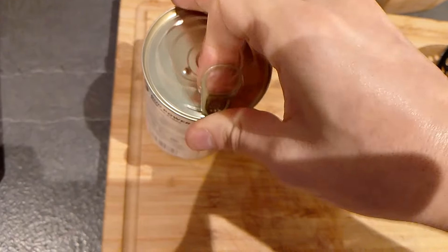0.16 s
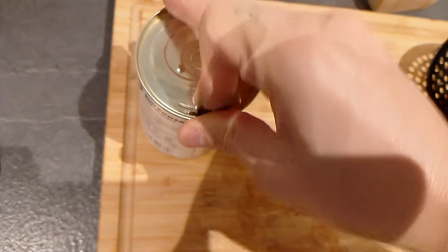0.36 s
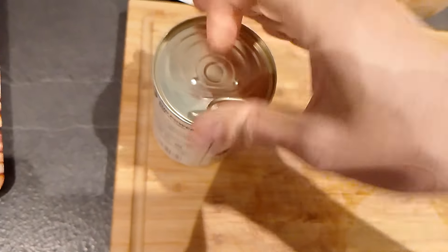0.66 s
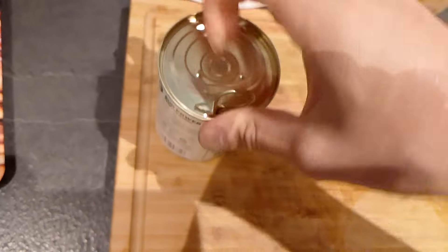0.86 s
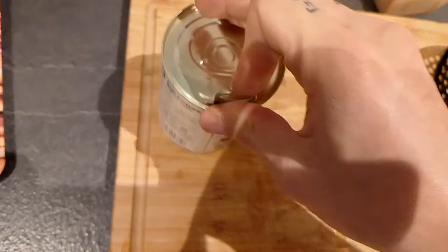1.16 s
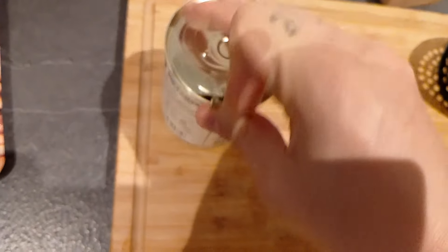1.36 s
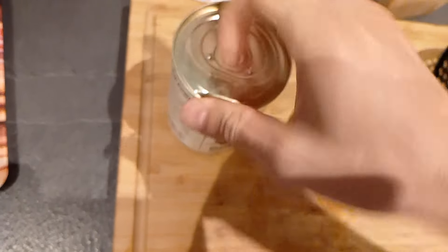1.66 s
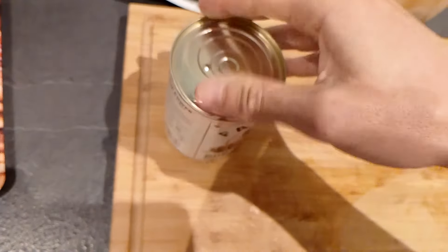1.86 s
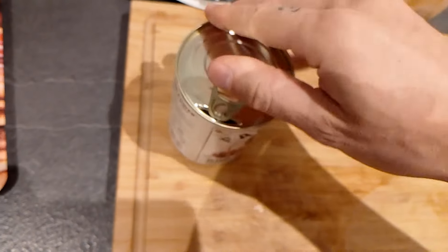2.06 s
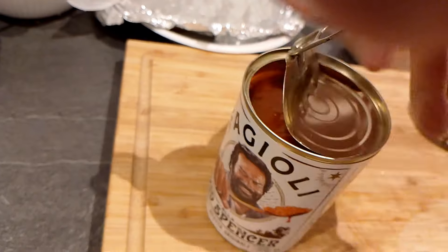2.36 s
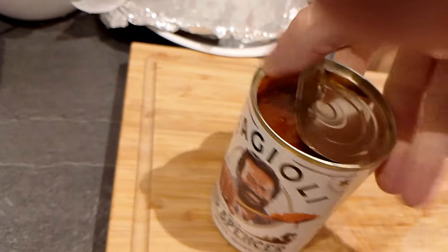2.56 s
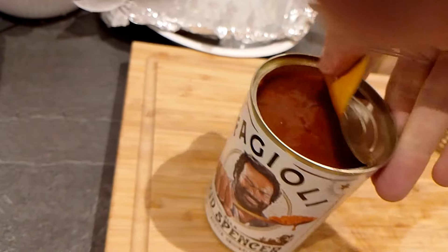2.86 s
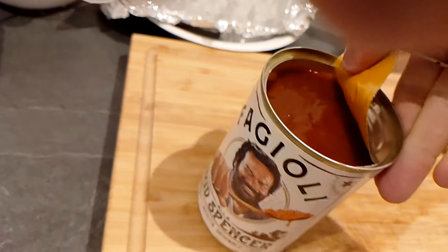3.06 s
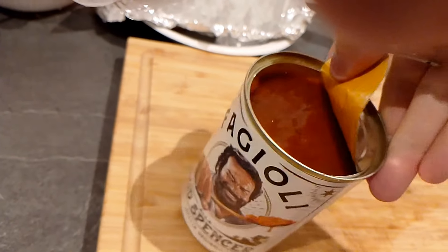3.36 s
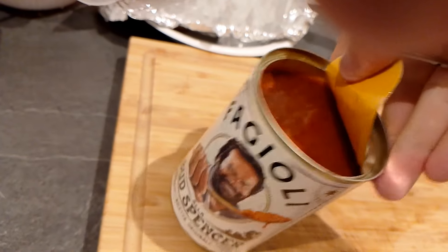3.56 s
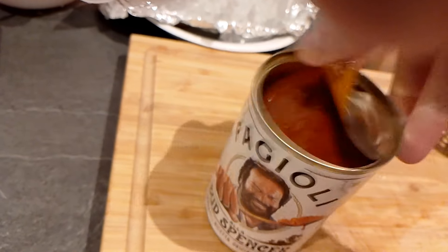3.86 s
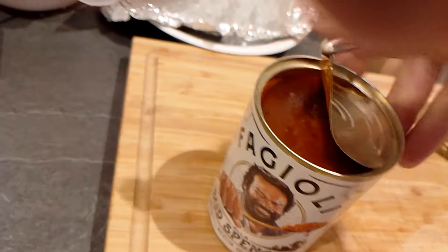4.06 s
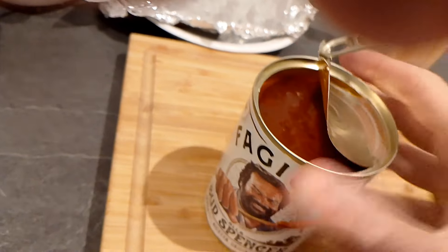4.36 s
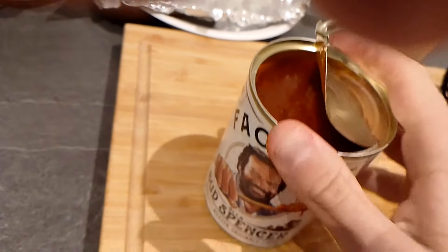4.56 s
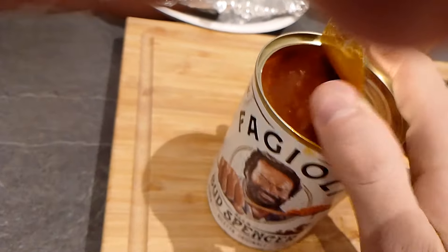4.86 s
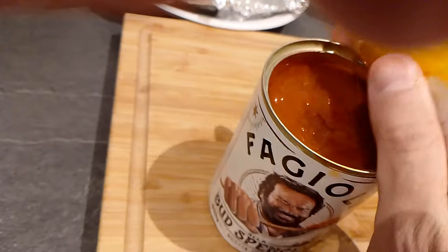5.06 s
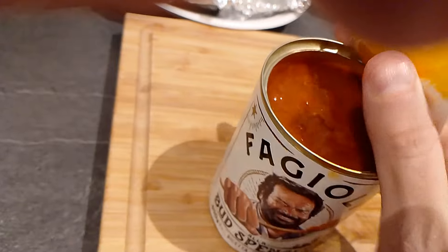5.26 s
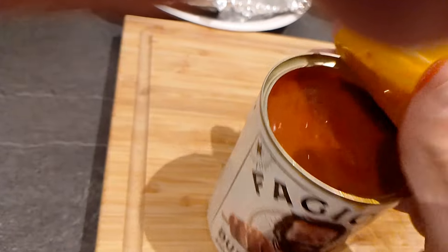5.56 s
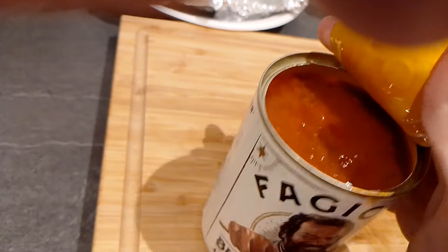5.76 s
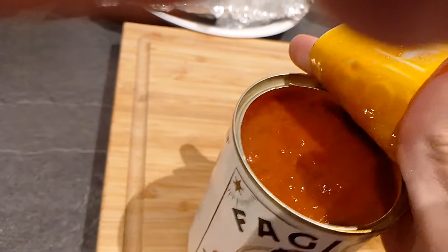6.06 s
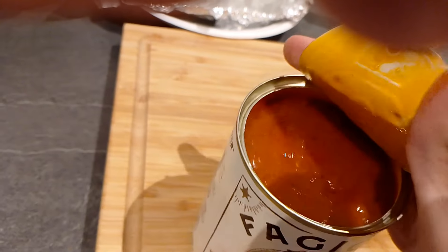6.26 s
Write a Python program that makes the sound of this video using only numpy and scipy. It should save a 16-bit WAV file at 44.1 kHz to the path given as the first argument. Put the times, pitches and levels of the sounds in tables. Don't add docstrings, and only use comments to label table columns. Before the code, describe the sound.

A tin is opened by hand on a wooden board, very close to the microphone in a small, hard, briefly ringing kitchen. At 0.2 s the tab snaps sharply and the tin answers. Skin and a fingertip drag grainily round the rim near 0.7 s, with a light tap at 1.0 s. The tin knocks the board at 1.7 s, and the seal pops with a short metallic ring at 2.05 s. An abrupt cut at about 2.4 s brings a small bright lid flex at 2.7 s, rubbing and nail ticks. A cluster of ticks and a hollow ping come around 3.8 s, a hard crack at 4.0 s, more ticks at 4.8 s. The loudest moment, a bright tearing crack, hits at 5.1 s. Faint handling follows, then a last buckle near 6.4 s. Soft room hum and a thin, wavering high electric whine run underneath.

```python
import sys
import numpy as np
from scipy import signal
from scipy.fft import rfft, irfft, next_fast_len
from scipy.io import wavfile
from scipy.ndimage import uniform_filter1d, map_coordinates

SR = 44100
rng = np.random.default_rng(int(sys.argv[2]) if len(sys.argv) > 2 else 0)


def store_wav(level_fs):
    pcm = np.round(np.clip(np.atleast_2d(level_fs), -1, 1) * 32767)
    wavfile.write(sys.argv[1], SR, pcm.T.astype(np.int16))


def to_linear_factor(level_db):
    exponent = np.asarray(level_db, float) / 20
    return 10 ** exponent


N = 282355
TIME = np.arange(N) / SR
SCENE_CHANGE_S = 2.373
ONSET_DELAY_S = 0.002

# start in seconds, peak in dB, t60 of the cracking in seconds, ringing in dB, room in dB.
CONTACTS = [
    (0.2326, -14, 0.02, -24.5, -8),
    (0.245, -25, 0.069, -17, -3.5),
    (1.037, -33.5, 0.016, -12.5, -8),
    (1.668, -16.5, 0.046, -19.5, -8),
    (2.0471, -12.5, 0.031, -20.5, -7),
    (5.1395, -6.5, 0.028, -35.5, -5),
    (6.377, -25, 0.051, -18, 1),
    (2.6882, -24, 0.015, -20, -9.5),
    (3.9944, -10, 0.013, -20, -4),
    (5.119, -21.5, 0.021, -22, -2),
]
# frequency in Hz, level in dB per Hz.
SHUT_COLOURS = [
    [(35, -33), (60, -15.5), (300, -3.5), (560, -8), (767, 3.5), (1010, -4), (1380, -1), (2900, -26.5),
     (3580, -24.5), (5720, -19.5), (6140, -40), (8510, -23), (16000, -53.5)],
    [(1180, -45), (2000, -4), (2620, -11.5), (2860, -18), (3400, -11), (6250, -13), (7700, 1.5),
     (11500, -16.5), (14500, -21.5), (16000, -17.5)],
    [(35, -52.5), (60, -26), (398, 4.5), (666, -19), (822, -31), (1220, -46), (1860, -33), (2250, -31),
     (2970, -23.5), (4640, -41), (8120, -16.5), (16000, -72)],
    [(35, -29.5), (60, -28), (323, 4.5), (560, -3.5), (803, -6.5), (1310, -10), (1440, -21.5),
     (1620, -11.5), (2140, -22), (2970, -17.5), (5090, -34), (9130, -37.5), (16000, -72)],
    [(35, -46.5), (70, -16), (308, -28), (469, -33.5), (924, 6), (1170, -14.5), (1310, -2), (1740, -36),
     (1910, -1), (2900, -50.5), (3340, -15), (3670, -34), (4320, -33.5), (16000, -79.5)],
]
# frequency in Hz, level in dB per Hz.
TORN_COLOURS = [
    [(35, -28.5), (60, 6.5), (202, -5.5), (274, 5.5), (363, -8.5), (437, 0.5), (515, -0.5), (760, -2),
     (1110, 0), (1660, -3.5), (1820, -5), (3760, 0.5), (5720, -8), (8120, 6), (16000, -18.5)],
    [(35, -58), (60, -10), (553, 4), (1280, -5.5), (1550, -14.5), (1910, 0.5), (2520, -18.5), (3940, -18),
     (4320, -36.5), (8710, -29), (16000, -51.5)],
    [(100, -20), (600, -24), (957, -23.5), (1470, -10.5), (1700, -13), (1960, -3), (4650, -14),
     (8500, -1.5), (11500, -22), (14900, -20), (16000, -25.5)],
    [(35, -31.5), (60, -19.5), (142, -2.5), (189, -24), (238, -8.5), (380, -17), (760, -14.5), (1470, -9.5),
     (2100, -14.5), (3670, -21), (5210, -37.5), (9130, -32.5), (16000, -91)],
    [(350, -48.5), (600, -16.5), (3390, -1), (3680, 2.5), (4160, -5.5), (4460, -2), (5480, -17.5),
     (6290, -4.5), (10000, -12), (16000, -30)],
]
# frequency in Hz, level in dB, t60 in seconds.
SHUT_PARTIALS = [
    [(299.0, -1.5, 0.26)] + [(741, 19.0, 0.04), (715, 3.5, 0.39), (450, -4, 0.25), (2062, -16.5, 0.72), (2610, -13, 0.14), (1297, -17.0, 0.096), (1329, 8.0, 0.073)],
    [],
    [(397, -6, 0.15), (796, -13.5, 0.098), (1930, -19.5, 0.072), (3020, -17, 0.13)],
    [(283.8, 6.5, 0.17), (328, 12.5, 0.014), (630, 0.5, 0.12), (1576, 2, 0.05), (1653, -1.5, 0.073), (1880, -3.5, 0.08)],
    [(82.5, -14.5, 0.5)] + [(470, -20.5, 0.8), (499.7, -5, 0.28), (820, -11.5, 0.075), (936, -7.0, 0.5), (1051, -4, 0.37), (1301, -4.5, 0.19), (1980, -21.5, 0.5), (1987, 2.5, 0.06), (2114, -10.0, 0.083), (2706, -20.0, 0.26), (2869, -21.5, 0.25), (3266, -2.5, 0.18), (4312, -17.5, 0.18), (5270, -30.5, 0.2)],
]
# frequency in Hz, level in dB, t60 in seconds.
TORN_PARTIALS = [
    [(3430, 0, 0.084), (3780, 11, 0.15), (4040, -2, 0.35)] + [(5060, -6, 0.15), (7100, 3, 0.15), (7503, -2.5, 0.15), (7900, 8, 0.085), (8285, -6, 0.31)],
    [(444, 17, 0.0052), (894, -1, 0.057), (1280, -7.5, 0.11), (1922, -16, 0.024)],
    [],
    [],
    [(3570, -4, 0.083)],
]


def snaps():
    track, t = np.zeros(N + SR), np.arange(SR * 3 // 4) / SR
    contacts = zip(CONTACTS, SHUT_COLOURS + TORN_COLOURS, SHUT_PARTIALS + TORN_PARTIALS)
    for (s, db, t60, ring_db, room_db), colour, modes in contacts:
        run, blow = struck(colour, t60, size=len(t))
        ring = to_linear_factor(ring_db) * ringing(modes, t, 0.0014)
        room = to_linear_factor(room_db) * echo(blow + 0.61 * ring)
        cracking = run + blow * (0.011 / t60) ** 2
        add(track, s + ONSET_DELAY_S, to_linear_factor(db) * (cracking + ring + room))
    return track[:N]


# start in seconds, level in dB.
BOARD_JOLTS = [
    (0.234, -50),
    (1.668, -40.5),
    (2.048, -45),
    (2.687, -60.5),
    (3.994, -38),
    (5.122, -43.5),
    (5.14, -40),
    (6.378, -46.5),
]
# frequency in Hz, level in dB, t60 in seconds.
ROOM_MODES = [(83.3, 0, 0.39), (145.8, -4.5, 0.49), (289, -10, 0.42)]


def jolts():
    track, t = np.zeros(N + SR), np.arange(SR * 3 // 4) / SR
    for s, db in BOARD_JOLTS:
        add(track, s + ONSET_DELAY_S, to_linear_factor(db) * ringing(ROOM_MODES, t, 0.017))
    return track[:N]


# start in seconds, peak in dB, dull part in dB, pitch in Hz.
SMALL_CONTACTS = [(0.6094, -54.5, -2.5, 3280), (1.2903, -57, 1, 8130), (1.504, -49, -6.5, 8220),
                  (1.6086, -57.5, -24, 2020), (1.8094, -61.5, 4, 2970), (2.025, -55, 15.5, 1900),
                  (2.0435, -47.5, 26, 3100), (2.4938, -62, -33, 8000), (2.5351, -55, -28, 2250),
                  (2.5797, -63, -29, 2120), (2.6424, -57, -22, 2860), (2.672, -56, -10.5, 2100),
                  (2.815, -55, -14.5, 2200), (2.9039, -58.5, -15, 7650), (2.9307, -56.5, -17, 2030),
                  (3.3874, -56, -27, 8500), (3.7669, -54, -13.5, 3550), (3.791, -41, -12.5, 3650),
                  (3.8374, -48.5, 12.5, 2150), (3.8566, -53.5, 7, 1900), (3.801, -48.5, -11.5, 4500),
                  (3.9566, -51.5, 0, 7600), (4.105, -48.5, -6.5, 7200), (4.5234, -59, -12.5, 8200),
                  (4.7322, -55.5, -21, 7800), (4.7952, -60, 13, 1983), (4.8306, -40, -11.5, 8010),
                  (4.014, -44, -9, 4300), (5.138, -31.5, -17, 7000), (6.345, -53.5, -8.5, 2540),
                  (6.3546, -44, -5, 3350), (6.372, -44, 3, 2640)]
# frequency in Hz, level in dB per Hz.
TICK_COLOUR = [(710, -46), (1200, -9), (2480, -1), (3180, -5), (3620, -4), (4000, -5), (5530, -15),
               (8080, -2), (12100, -22), (15000, -24.5), (16000, -30.5)]
# frequency in Hz, level in dB per Hz.
KNOCK_COLOUR = [(59, -25), (100, 0.5), (210, -6.5), (652, 4), (988, -11), (1290, -9), (1770, -9),
                (3020, -26), (3500, -25), (4550, -50.5), (7700, -120)]


def ticks():
    track, t = np.zeros(N + SR), np.arange(SR // 3) / SR
    for s, db, dull_db, hz in SMALL_CONTACTS:
        note = 0.32 * ringing([(hz, 0, 0.045)], t, 0.00073)
        bright = np.array(struck(TICK_COLOUR, 0.025, size=len(t))) + note
        dull = np.array(struck(KNOCK_COLOUR, 0.076, size=len(t)))
        run, blow = bright + to_linear_factor(dull_db) * dull
        add(track, s, to_linear_factor(db - 0.5) * (run + to_linear_factor(-9.0) * echo(blow)))
    return track[:N]


# start in seconds, level in dB, frequency in Hz, t60 in seconds.
PUSHES = [(2.025, -45.5, 920, .08), (2.025, -50, 330, .08), (2.669, -68, 2100, .04),
          (2.931, -62, 1900, .04), (3.792, -54, 589, .1), (3.834, -52, 584, .08), (3.833, -62.5, 4700, .05),
          (3.8555, -42, 590, 0.13), (3.857, -66, 3650, .25), (3.93, -52.5, 600, .1),
          (3.97, -65.5, 5300, .08), (4.799, -60.5, 1900, .05), (5.581, -75, 2200, .15),
          (5.649, -74, 2200, 0.25), (5.65, -78, 2850, .25)]


def pings():
    track, t = np.zeros(N + SR), np.arange(SR // 3) / SR
    for s, db, hz, t60 in PUSHES:
        note = ringing([(hz, db, t60)], t, 0.0035)
        add(track, s, note + to_linear_factor(-8.5) * echo(note))
    return track[:N]


# strongest moment, rise and fall in seconds, board rumble in dB, tin body in dB.
TIN_SHIFTS = [(0.66, .2, .3, -75, -66.5), (1.14, 0.078, .1, -88, -83.5), (1.32, 0.09, 0.12, -66, -90),
              (1.81, 0.08, 0.18, -59.5, -73), (2.33, 0.078, 0.057, -59.5, -68.5),
              (2.84, 0.25, 0.28, -70.5, -85), (3.54, 0.15, 0.066, -65, -74), (3.86, 0.07, 0.26, -60.5, -61),
              (3.8, 0.0083, .15, -64, -70), (3.94, 0.18, 0.17, -74, -62), (4.63, 0.08, .15, -62, -79),
              (4.83, 0.031, 0.16, -55.5, -71.5), (5.67, .1, 0.11, -67.5, -80),
              (5.97, 0.12, 0.14, -66.5, -70)]
# strongest moment, rise and fall in seconds, rub in dB, fizz in dB.
SKIN_RUBS = [(0.66, .3, 0.33, -73, -73), (1.28, 0.1, 0.095, -81.5, -86.5), (1.52, 0.027, 0.028, -83, -71),
             (1.64, 0.017, 0.15, -76, -76), (1.81, 0.072, 0.26, -79.5, -74.5),
             (2.6, 0.25, 0.19, -83.5, -83.5), (2.8, 0.071, 0.081, -85, -88),
             (3.795, 0.0092, 0.22, -65, -70), (3.93, 0.28, 0.84, -77, -78), (4.11, .03, 0.059, -76.5, -60),
             (4.84, 0.033, 0.19, -69.5, -67), (5.59, 0.062, 0.07, -78, -75.5),
             (5.69, 0.12, 0.079, -74, -76), (6.375, 0.047, 0.027, -57.5, -52.5)]
# rumble, body, rub and fizz, in dB.
RESTING_HAND_DB = [-78, -81.5, -88.5, -84]
# frequency in Hz, level in dB per Hz.
RUMBLE_COLOUR = [(12, -52.5), (20, -21.5), (76, 3.5), (113, -7), (150, 0), (193, -24), (236, -7.5),
                 (319, -11), (400, -27), (520, -37.5), (880, -120)]
# frequency in Hz, level in dB per Hz.
BODY_COLOUR = [(120, -37.5), (200, -10), (433, -5), (471, -1.5), (582, -12), (667, -12.5), (711, -8.5),
               (807, -8), (2500, -18), (3250, -57), (5500, -120)]
# frequency in Hz, level in dB per Hz.
RUB_COLOUR = [(940, -33.5), (1600, 4), (1760, -1), (2220, -7), (2380, -9), (2500, 2), (3200, -9.5),
              (4140, -2), (4600, -9.5), (5080, -12), (5850, -12), (6500, -14.5), (8450, -45.5),
              (14300, -120)]
# frequency in Hz, level in dB per Hz.
FIZZ_COLOUR = [(3240, -33.5), (5500, -4.5), (5860, -7.5), (6670, -8), (7450, -2.5), (8480, 2), (9440, -6),
               (12200, -16.5), (14600, -16.5), (15500, -29.5), (16000, -31)]
# frequency in Hz, width in Hz, level in dB.
WALL_PEAKS = [(617, 51, 9.5), (909, 37, 0.5), (1252, 28, 2.5)]
# frequency in Hz, width in Hz, level in dB.
LID_PEAKS = [(2200, 190, 5.5), (3200, 710, 11), (4660, 390, 11), (5960, 89, 9.5)]


def hands():
    hold = to_linear_factor(RESTING_HAND_DB)[:, None]
    late_drop = to_linear_factor(-16.5 * (TIME > 5))
    rumble_gain, body_gain = hold[:2] + swells(TIN_SHIFTS)
    rub_gain, fizz_gain = hold[2:] * late_drop + swells(SKIN_RUBS)
    grip = wobble(25)
    rumble = rumble_gain * to_linear_factor(2.5 * wobble(14)) * noise(RUMBLE_COLOUR, size=N)
    body_grip = to_linear_factor(0.82 * grip + 0.35 * wobble(90))
    body = body_gain * body_grip * sings(noise(BODY_COLOUR, size=N), WALL_PEAKS)
    rub_grip = to_linear_factor(0.94 * grip + 0.48 * wobble(320))
    rub = rub_gain * rub_grip * sings(noise(RUB_COLOUR, size=N), LID_PEAKS)
    fizz_grip = to_linear_factor(-3.5 + 0.69 * grip + 1.5 * wobble(280))
    fizz = fizz_gain * fizz_grip * noise(FIZZ_COLOUR, size=N)
    return rumble + body + rub + fizz


# strongest moment, rise and fall in seconds, low bands in dB, high bands in dB.
RIM_DRAGS = [
    (.7, 0.33, 0.27, -71, -72),
    (2.81, 0.055, 0.041, -74, -79.5),
    (5.7, 0.092, .05, -80.5, -86),
]
# frequency in Hz, level in dB per Hz.
RIM_LOW_COLOUR = [(2300, -29), (2800, -6), (3200, 0.5), (3600, -6), (4000, -16.5), (4550, -3),
                  (5000, -17.5), (5500, -40)]
# frequency in Hz, level in dB per Hz.
RIM_HIGH_COLOUR = [(5200, -39), (5600, -12.5), (5850, 0), (6200, -12), (7000, -9), (7800, 0), (9500, -8),
                   (13000, -39)]


def drags():
    grain = to_linear_factor(1.5 * wobble(60) + 1.3 * wobble(400))
    low, high = swells(RIM_DRAGS) * grain
    return low * noise(RIM_LOW_COLOUR, size=N) + high * noise(RIM_HIGH_COLOUR, size=N)


# time in seconds, offset in Hz, level in dB.
WHINE_PATH = [(0, 3, -85.5), (0.7, 0, -81.5), (1.3, -5.5, -76.5), (2.36, 9.5, -77.5), (2.39, -62.5, -65.5),
              (2.7, 60.5, -87), (3.1, -32.5, -73), (3.55, 5.5, -73.5), (3.66, 22.5, -83), (3.86, 13, -71.5),
              (4.3, -18, -74.5), (4.6, 39, -79.5), (4.8, 33.5, -93), (4.98, 5, -72), (5.53, 7, -73),
              (5.62, 12.5, -82), (6.1, 4, -74.5), (6.4, 10, -81.5)]


def whine():
    offset_hz, db = curves(WHINE_PATH)
    phase = 2 * np.pi * np.cumsum(9100 + offset_hz + 4 * wobble(40)) / SR
    return to_linear_factor(db + 4.0 + 2.2 * wobble(22) + 2.9 * wobble(70)) * np.sin(phase)


# frequency in Hz, level in dB per Hz.
REST_COLOUR = [(12, -35), (20, 4), (65, 0), (216, -7.5), (285, -6.5), (738, -20), (1570, -19), (2080, -22),
               (3250, -22.5), (6180, -31.5), (7950, -28.5), (8890, -21.5), (9950, -34), (16000, -35.5)]


def room_hum():
    return to_linear_factor(-73) * noise(REST_COLOUR, size=N)


# frequency in Hz, t60 in seconds.
KITCHEN_T60 = [(100, 0.45), (500, 0.6), (2000, 0.54), (6000, 0.46), (12000, 0.4)]


def echo(x):
    hz, t, z = signal.stft(rng.standard_normal(SR * 3 // 4), SR, nperseg=256)
    decay = to_linear_factor(-60 * t / along(KITCHEN_T60, hz)[:, None])
    tail = signal.istft(z * decay, SR, nperseg=256)[1]
    tail = tail * (1 - np.exp(-np.arange(len(tail)) / SR / 0.0023))
    return signal.fftconvolve(x, tail / np.linalg.norm(tail))[:len(x)]


def struck(spectrum, t60, size):
    m = next_fast_len(size)
    gain = to_linear_factor(along(spectrum, np.fft.rfftfreq(m, 1 / SR)))
    cepstrum = irfft(np.log(gain + 1e-6), m)
    cepstrum[1:m // 2] *= 2
    cepstrum[m // 2 + 1:] = 0
    colour = np.exp(rfft(cepstrum))
    shape = fade(np.arange(m) / SR, t60, 0.049 * t60)
    run = irfft(colour * rfft(shape * rng.standard_normal(m)), m)[:size]
    blow = irfft(colour, m)[:size]
    energy = 0.5 * np.linalg.norm(shape)
    return energy * run / np.linalg.norm(run), energy * blow / np.linalg.norm(blow)


def ringing(modes, t, rise):
    total = np.zeros(len(t))
    for hz, db, t60 in modes:
        steps = 0.03 * uniform_filter1d(rng.standard_normal(len(t)), size=64)
        drift = np.cumsum(steps) * (hz / 1500) ** 0.5
        slow = uniform_filter1d(uniform_filter1d(steps / 0.022, size=900), size=500)
        beat_db = 105 * slow * np.minimum(t / 0.013, 1)
        total += to_linear_factor(db + beat_db) * fade(t, min(t60, 0.9), rise) * np.sin(2 * np.pi * hz * t + drift)
    return total


def sings(x, peaks):
    m = next_fast_len(N)
    f = np.fft.rfftfreq(m, 1 / SR)
    response = 1
    for centre, width, db in peaks:
        damping = 1j * f * width
        response = response + to_linear_factor(db) * damping / (centre ** 2 - f ** 2 + damping)
    return unit(irfft(rfft(x, m) * response, m)[:N])


def swells(rows):
    gains = np.zeros((2, N))
    for s, rise, fall, a_db, b_db in rows:
        away = np.maximum((s - TIME) / rise, (TIME - s) / fall)
        gains += to_linear_factor(np.array([[a_db], [b_db]]) - 20 * away)
    return gains


def fade(t, t60, rise):
    return to_linear_factor(-60 * t / max(t60, 0.003)) * (1 - np.exp(-t / max(rise, 1e-4)))


def noise(spectrum, size):
    m = next_fast_len(size + 4096)
    gain = to_linear_factor(along(spectrum, np.fft.rfftfreq(m, 1 / SR)))
    return unit(irfft(rfft(rng.standard_normal(m)) * gain, m)[:size])


def wobble(rate):
    knots = rng.standard_normal(int(N * rate / SR) + 4)
    return map_coordinates(knots, [np.arange(N) * rate / SR])


def curves(rows):
    s, *columns = np.transpose(rows)
    return [np.interp(TIME, s, column) for column in columns]


def along(points, hz):
    f, v = np.transpose(points)
    return np.interp(np.log(hz + 1), np.log(f + 1), v)


def unit(x):
    return x / np.sqrt(np.mean(x ** 2) + 1e-20)


def add(track, s, x):
    if s < SCENE_CHANGE_S:
        x = x[:round((SCENE_CHANGE_S - s) * SR)]
    track[round(s * SR):][:len(x)] += x


def scene():
    tin = snaps() + jolts() + ticks() + pings()
    fingers = hands() + drags()
    return (tin + fingers + whine() + room_hum())[None]


def hushed(x):
    memory_s, glance_s, late_s = 0.3, 0.047, 0.35
    hop = 256
    z = signal.stft(x, nperseg=1024, noverlap=768)[2]
    level_db = 20 * np.log10(np.abs(z) + 1e-7)
    level_db = level_db - np.percentile(level_db, 40, axis=-1, keepdims=True)

    def mean(seconds):
        share = hop / SR / seconds
        return signal.lfilter([share], [1, share - 1], level_db)

    late = round(late_s * SR / hop)
    learnt = np.pad(mean(memory_s), ((0, 0), (0, 0), (late, 0)))[..., :-late]
    over_db = learnt - mean(glance_s)
    line_db = np.clip(2.2 * (learnt - uniform_filter1d(learnt, size=15, axis=1)), 0, 14)
    line_db = line_db * np.clip(over_db / 6, 0, 1)
    cut_db = np.clip(0.37 * (over_db - 7), 0, 5) + line_db
    return signal.istft(z * to_linear_factor(-cut_db), nperseg=1024, noverlap=768)[1][..., :x.shape[-1]]


def roll_off(x):
    return signal.sosfilt(signal.butter(12, 16440, fs=SR, output="sos"), x)


def record(dry):
    shots = np.split(dry, [round(SCENE_CHANGE_S * SR)], axis=1)
    quiet = np.hstack([hushed(shot) for shot in shots])
    band_limit = 1 / (1 + (np.fft.rfftfreq(N, 1 / SR) / 15650) ** 80)
    heard = irfft(rfft(quiet) * band_limit, N)
    dip = np.clip(np.abs(TIME - SCENE_CHANGE_S) / 0.004, 0, 1)
    return roll_off(heard * dip)


dry = scene()
out = record(dry)
store_wav(out)
```